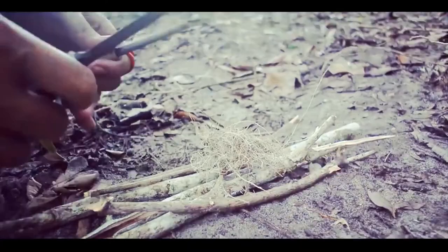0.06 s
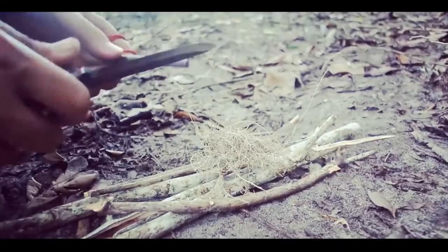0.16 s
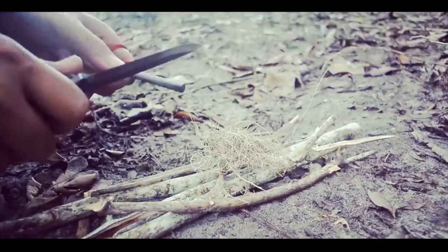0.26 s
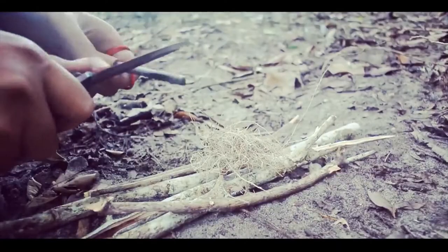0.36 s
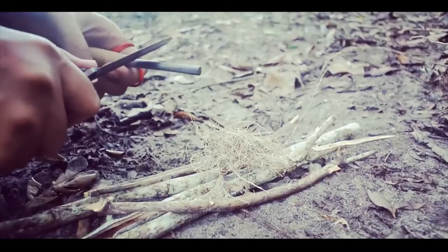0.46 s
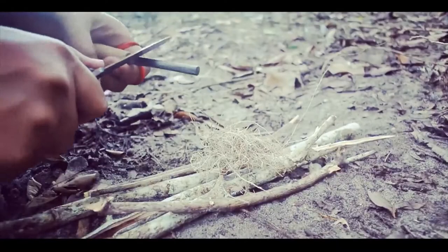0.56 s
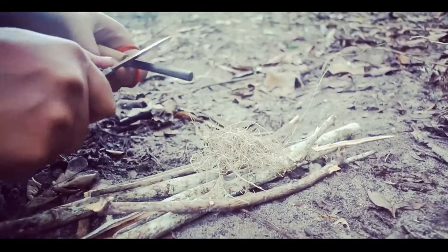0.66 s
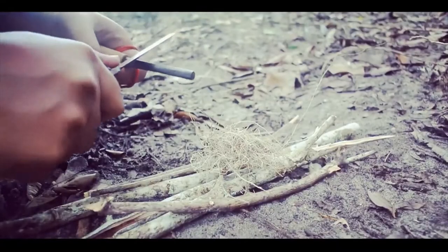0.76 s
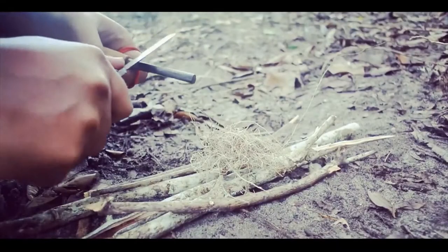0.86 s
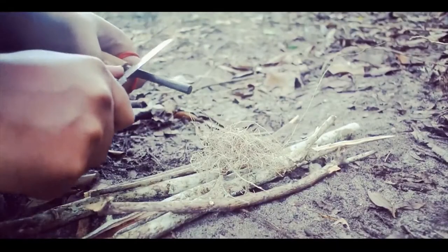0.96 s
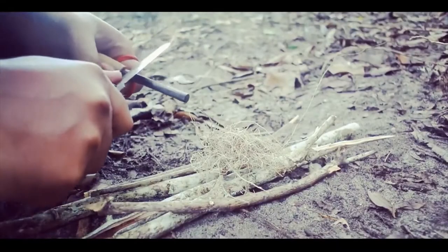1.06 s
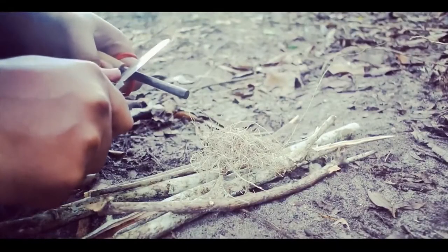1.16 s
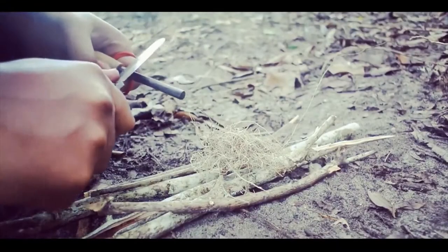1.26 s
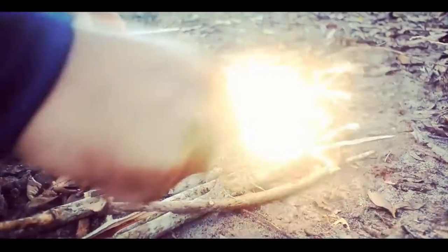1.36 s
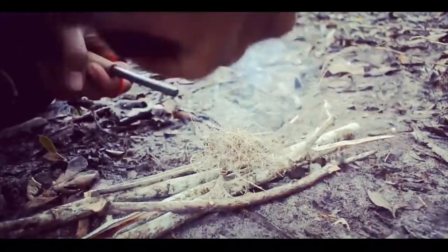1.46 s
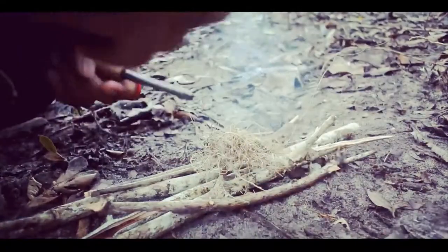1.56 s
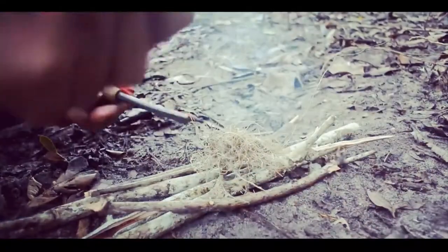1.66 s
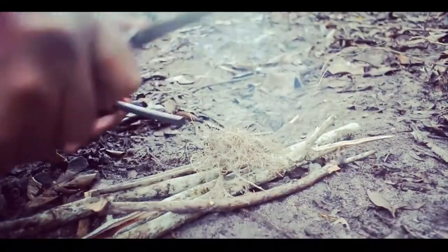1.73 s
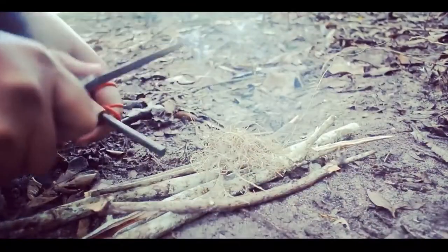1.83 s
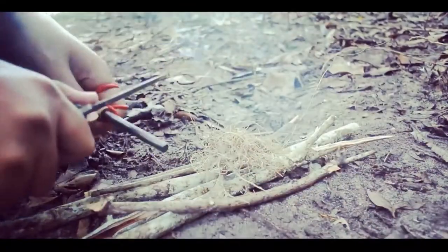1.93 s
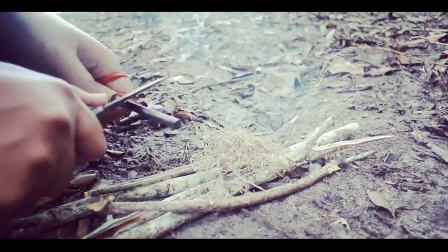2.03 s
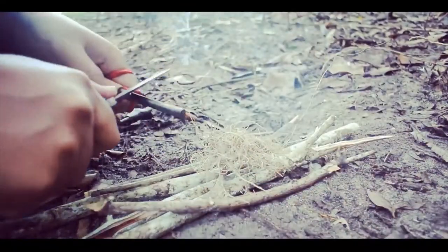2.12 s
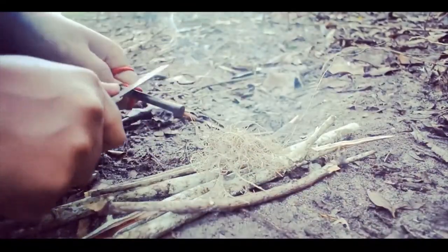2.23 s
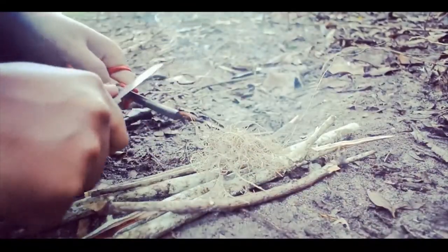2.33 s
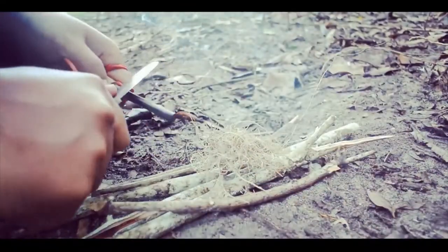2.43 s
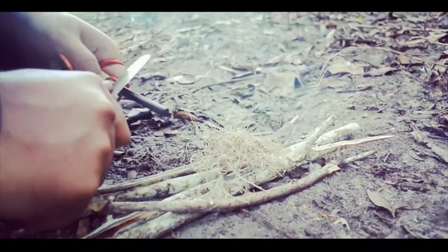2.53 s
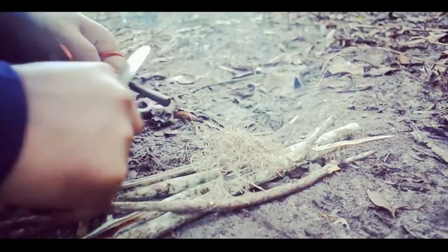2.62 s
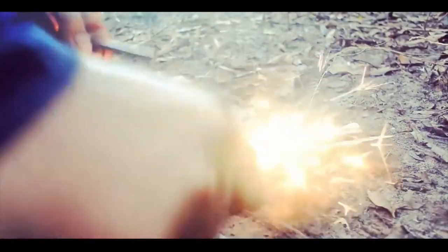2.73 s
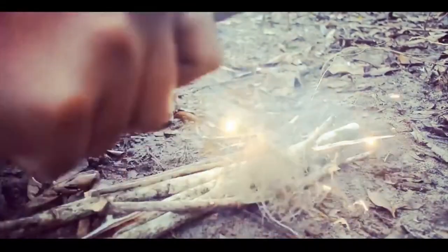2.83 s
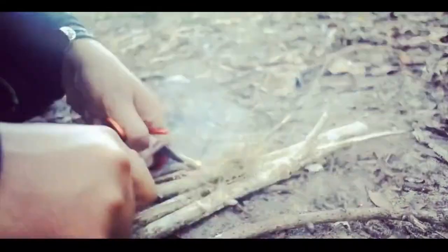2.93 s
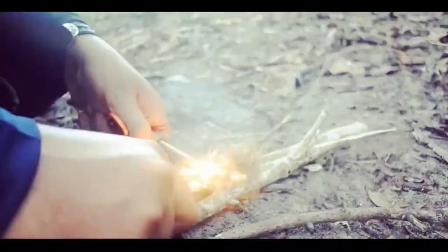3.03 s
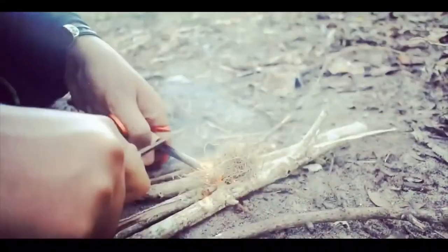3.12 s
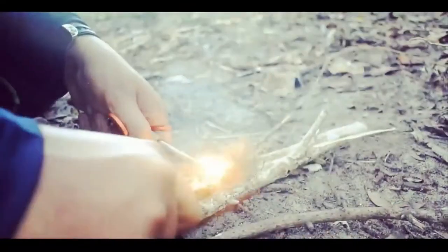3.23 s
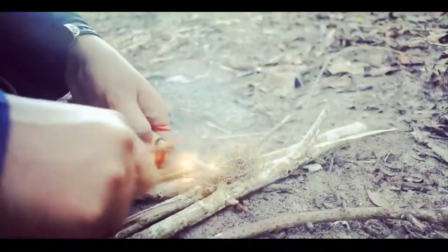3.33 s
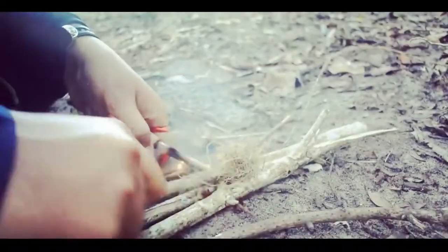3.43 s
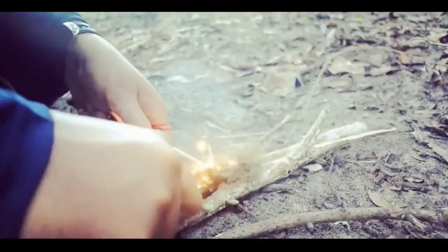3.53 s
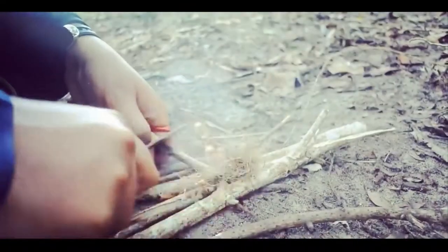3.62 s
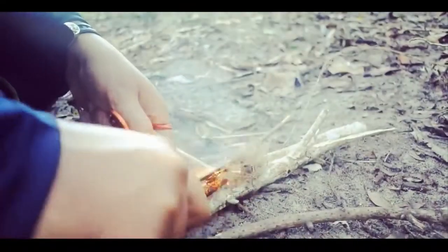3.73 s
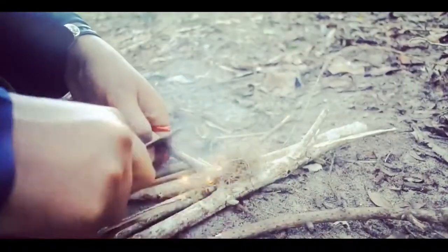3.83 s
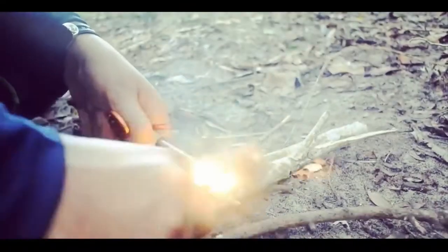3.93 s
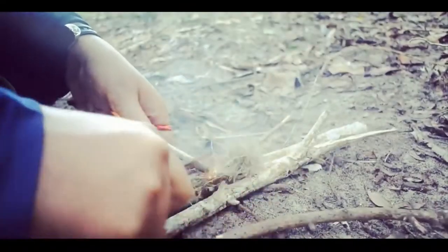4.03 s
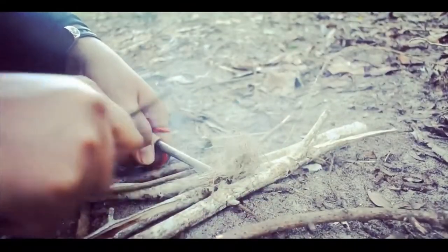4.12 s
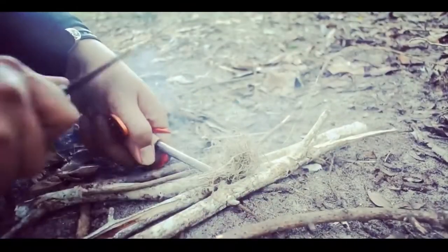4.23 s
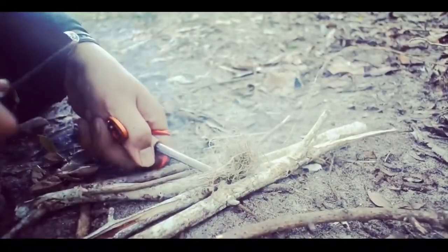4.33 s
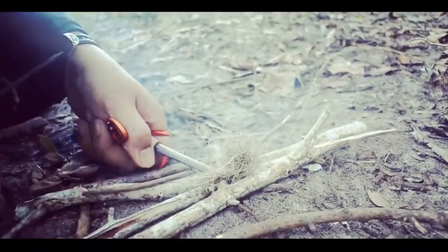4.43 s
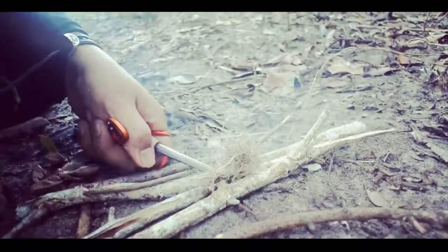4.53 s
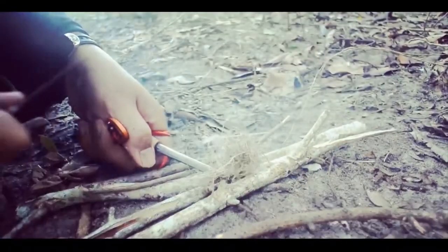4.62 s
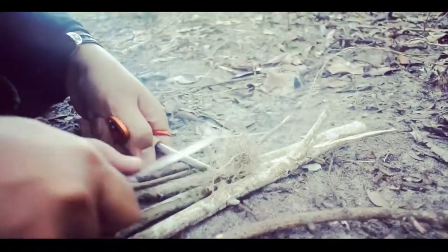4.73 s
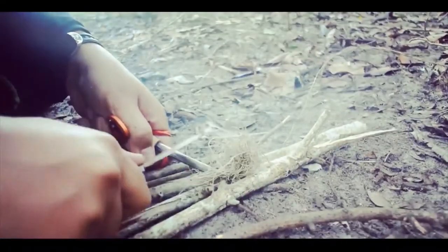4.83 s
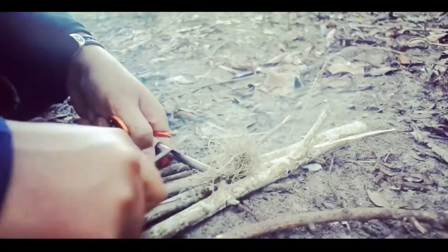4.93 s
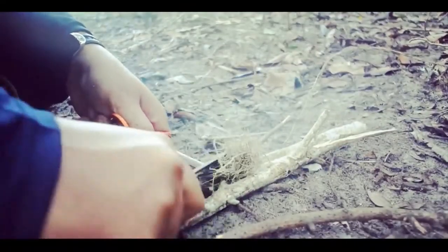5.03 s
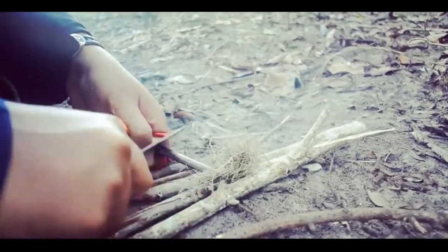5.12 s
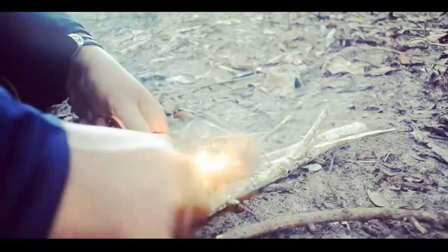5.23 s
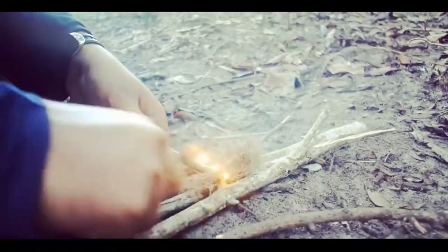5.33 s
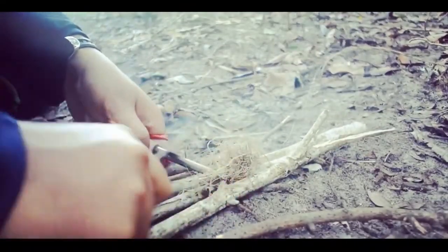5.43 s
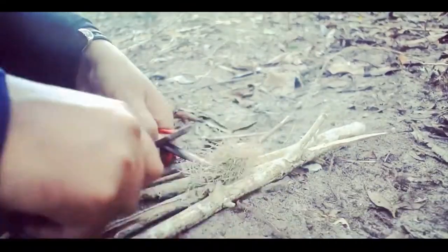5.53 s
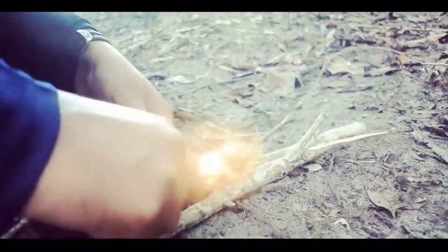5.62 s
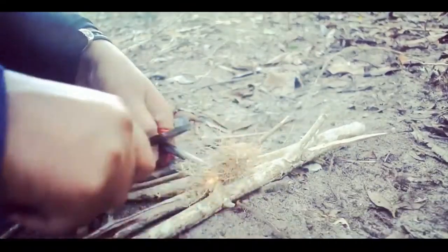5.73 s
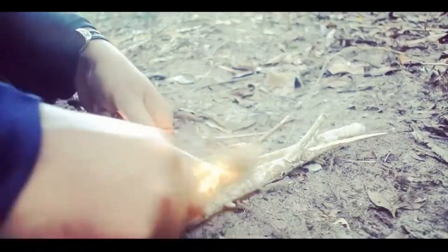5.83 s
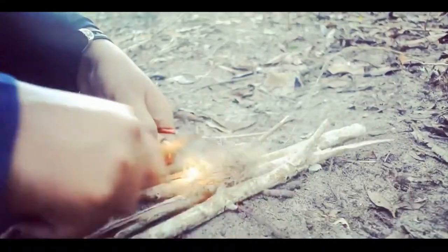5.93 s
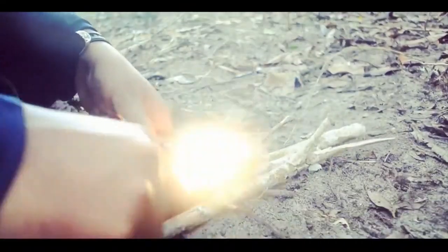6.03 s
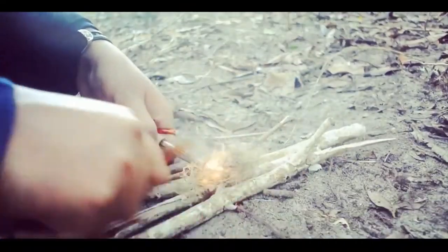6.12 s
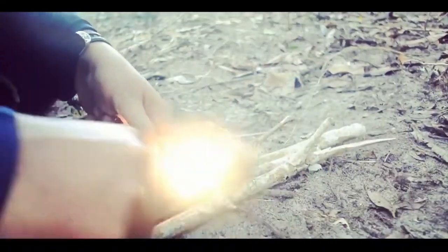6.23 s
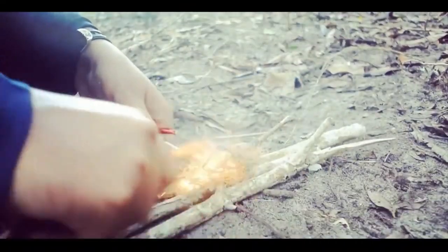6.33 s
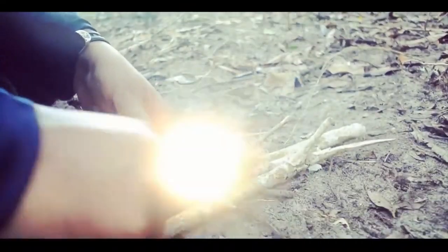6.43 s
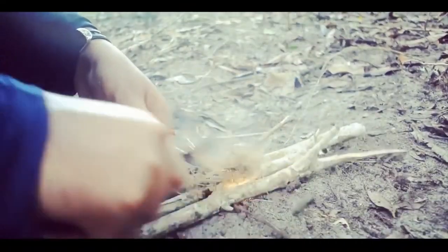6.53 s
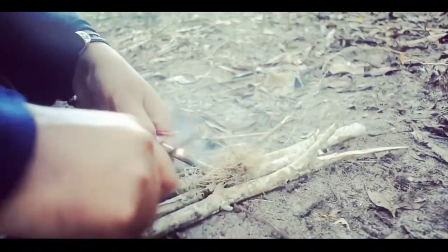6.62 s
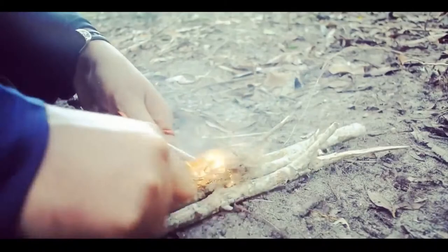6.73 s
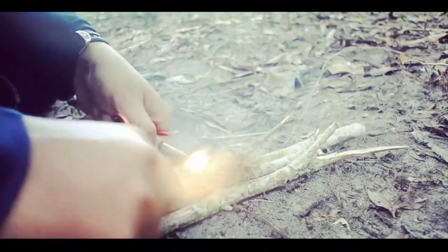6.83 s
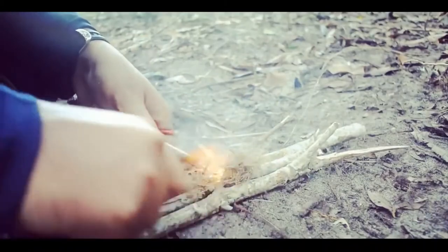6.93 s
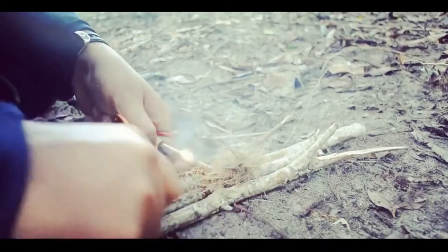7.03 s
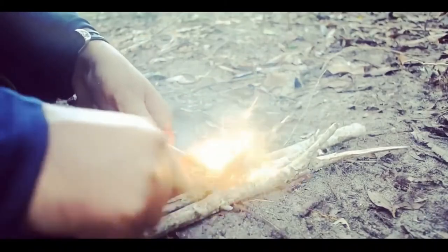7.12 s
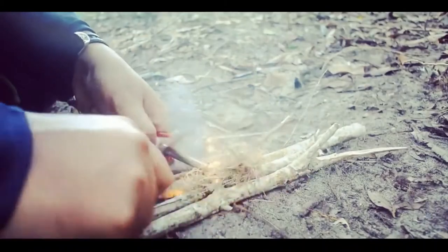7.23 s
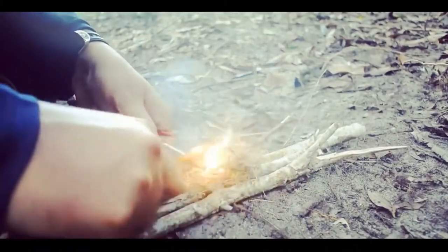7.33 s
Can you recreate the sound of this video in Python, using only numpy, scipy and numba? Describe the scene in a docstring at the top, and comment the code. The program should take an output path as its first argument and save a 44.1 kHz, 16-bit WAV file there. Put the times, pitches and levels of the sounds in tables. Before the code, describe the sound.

Two lone raspy strikes, then rapid back-and-forth scraping of a blade on a ferro rod, clacking and spitting sparks over faint forest air.

```python
"""Quiet woods: a knife blade is scraped along a ferro rod, close to the ground and close to the listener.
Each push shaves the rod in a gritty hiss with a puff of sparks; the blade rasps back, chatters and clacks.
Scrapes are random grains shaped by blade speed and coloured by steel resonances; knocks ring and thud.
Burning flecks snap as short bright crackles, and filtered noise makes a soft rush of air in the trees."""
import sys
import numpy as np
from scipy import signal
from scipy.fft import rfft, irfft
from scipy.io import wavfile
from scipy.ndimage import map_coordinates
from numba import njit

SR = 44100
rng = np.random.default_rng(int(sys.argv[2]) if len(sys.argv) > 2 else 0)


def to_wav(s):
    """Save 16-bit WAV."""
    ch = np.atleast_2d(s).T  # columns
    pcm = np.round(np.clip(ch, -1, 1) * 32767)  # PCM
    wavfile.write(sys.argv[1], SR, pcm.astype(np.int16))


N = 324708

# a stroke is a push down the rod and a drag back:
# start_s, push_length_s, return_length_s, push_hiss_db, return_rasp_db, spark_puff_db (before its swell)
STROKES = [(1.258, 0.091, 0.019, -19, -36, -36), (2.592, 0.11, 0.055, -19.5, -38.5, -38),
           (2.906, 0.16, 0.075, -17.5, -26.5, -36.5), (3.142, 0.13, 0.088, -19, -30, -37.5),
           (3.369, 0.11, 0.11, -18.5, -29.5, -35.5), (3.592, 0.11, 0.11, -17.5, -27.5, -33.5),
           (3.813, 0.1, 0.13, -18, -42.5, -34.5), (4.915, 0.13, 0.07, -21, -28, -59),
           (5.144, .146, 0.062, -18.5, -24.3, -37), (5.4, 0.079, 0.0022, -21.5, -26.5, -42),
           (5.504, 0.18, 0.029, -20.5, -29, -35), (5.74, 0.13, 0.074, -19, -28.5, -37.5),
           (5.96, 0.12, 0.062, -18.5, -29, -36.5), (6.166, .152, 0.04, -21, -33, -35),
           (6.373, 0.11, .069, -19.3, -28.5, -36), (6.589, .135, 0.039, -21.5, -30, -40),
           (6.781, 0.12, 0.089, -19.5, -27.5, -35.5), (6.982, 0.14, .049, -19, -24.5, -34),
           (7.19, 0.13, 0.043, -20.5, -26.5, -36)]
# the blade knocks on the rod: start_s, peak_db, thud_db (against the clack)
BLADE_KNOCKS = [(0.4632, -5.5, -37), (1.99, -12.5, -4), (2.8767, -25.5, 2), (4.8426, 1.5, -10.5),
                (5.0842, -1.5, -30), (5.0999, -4.5, -2), (5.351, -12.5, 7), (5.697, -3, -1.5),
                (5.933, -7, 2), (6.144, -25, 13), (6.542, -4, -0.5), (7.355, -5, 1.5)]
# resonances of blade and rod: pitch_hz, width_hz, lift_db (at full freedom to ring)
STEEL_MODES = [(1550, 120, 3), (2900, 254, 11), (4520, 1100, 6), (6520, 180, -4), (9020, 590, 5),
               (12000, 780, 6.5)]
# colour of the coarse rasp: pitch_hz, level_db
RASP_COLOUR = [(300, -28), (1000, -10.5), (1500, -2.5), (2400, 0.5), (3400, 0.5), (4500, -4.5), (7000, -15),
               (16000, -51)]
# the rod lies a little to the right, so the right channel leads
LEAD_SAMPLES = 2


def undb(db):
    """Turn decibels into gain."""
    return 10 ** (np.asarray(db) / 20)


def unit(x):
    """Scale to rms 1."""
    return x / np.sqrt(np.mean(x ** 2))


def add(out, start_s, sound):
    """Mix a stereo sound in at a start time."""
    i = int(start_s * SR)
    out[:, i:i + sound.shape[1]] += sound[:, :N - i]


def slope(points, hz):
    """Read a colour (pitch_hz, level_db) on a log-frequency axis."""
    point_hz, db = np.transpose(points)
    return np.interp(np.log(hz + 1), np.log(point_hz), db)


def response(points, modes=(), size=1024):
    """Causal minimum-phase impulse response of unit energy: a colour lifted by resonances."""
    hz = np.arange(size // 2 + 1) * SR / size
    db = slope(points, hz)
    for mode_hz, width_hz, lift_db in modes:
        db = db + lift_db / (1 + (2 * (hz - mode_hz) / width_hz) ** 2)
    # folding the cepstrum puts the energy as early as it can be
    cepstrum = irfft(np.log(undb(db)))[:size // 2]
    cepstrum[0] = 0
    impulse = irfft(np.exp(rfft(2 * cepstrum, size)))
    return impulse / np.linalg.norm(impulse)


def filtered(pair, impulse):
    """Pass both channels through one impulse response."""
    return signal.fftconvolve(pair, impulse[None], axes=1)


def walk(n, rate_hz):
    """Random levels, joined by straight lines."""
    steps = np.arange(n) * rate_hz / SR
    knots = rng.standard_normal(int(steps[-1]) + 2)
    return np.interp(steps, np.arange(len(knots)), knots)


def gripped(loose_tight, time_s):
    """Move a setting from its loose to its tight value as the grip tightens from 3.4 s to 5.6 s."""
    return np.interp(time_s, (3.4, 5.6), loose_tight)


def woods(rush_lift_db=1.4, leaves_lift_db=3.5, split_hz=1900, flicker_db=1):
    """Air in the trees: a low rush and an upper leaf hiss of spread noise, heard at a level that dips and recovers."""
    # colour of the air: pitch_hz, level_db
    air_colour = [(15, -55), (25, -27), (49, -21), (185, -4), (223, -6), (256, -3.5), (463, -2),
                  (575, -2.5), (887, -7), (1070, -6.5), (1700, -7.5), (2690, -4.5), (12200, -11.5),
                  (14400, -14.5), (16000, -25)]
    # level of the air as heard: time_s, rush_db, leaf_hiss_db (both before their lifts)
    early_air = [(0.0, -48, -48), (1.15, -45.5, -45.5), (1.37, -51, -48), (1.88, -47, -46.5),
                 (2.34, -50, -51), (2.56, -52, -53.5)]
    # the same further on, where it ducks and recovers: time_s, rush_db, leaf_hiss_db (before their lifts)
    later_air = [(4.06, -53.5, -50.5), (4.282, -48.5, -47), (4.466, -47.5, -47), (4.9, -48.5, -49.5)]
    hz = np.arange(N // 2 + 1) * SR / N
    time_s, rush_db, leaves_db = np.transpose(np.vstack([early_air, later_air]))
    mid, side = rfft(rng.standard_normal((2, N))) * undb(slope(air_colour, hz))
    # less side than mid through the low middle, so the channels are more alike there
    side *= undb(slope([(60, 0), (200, -8.5), (700, -6), (1400, -4.5), (5000, 0)], hz))
    both = np.array([mid + side, mid - side])
    low_share = 1 / (1 + (hz / split_hz) ** 4)
    out = 0
    for share, db in ((low_share, rush_db + rush_lift_db), (1 - low_share, leaves_db + leaves_lift_db)):
        level_db = np.interp(np.arange(N) / SR, time_s, db) + flicker_db * walk(N, 22)
        out = out + unit(irfft(both * share, N)) * undb(level_db)
    return out


def contact_space(x, scatter_db, t60_s=0.013, pan_db=1.5):
    """A single contact: direct sound plus treble scattered by hands and ground, different in each channel."""
    t = np.arange(int(.03 * SR)) / SR
    scatter = rng.standard_normal((2, len(t))) * undb(-60 * t / t60_s) * (1 - np.exp(-t / 0.00046))
    scatter /= np.linalg.norm(scatter, axis=1, keepdims=True)
    treble = signal.butter(1, 2500, "high", fs=SR, output="sos")
    paths = undb(scatter_db) * signal.sosfilt(treble, scatter)
    # direct sound: the right channel first
    paths[0, LEAD_SAMPLES] += 1
    paths[1, 0] += 1
    paths *= undb([[-pan_db / 2], [pan_db / 2]]) / np.hypot(1, undb(scatter_db))
    return signal.fftconvolve(x[None], paths, axes=1)


def knocks(ring_t60_s=0.025, steel_share=0.93, soft_dulling=0.31):
    """A hard contact: a dry clack, a short ring that the fingers damp, and a thud through the rod."""
    # colour of the clack: pitch_hz, level_db
    clack_colour = [(100, -28), (900, -15), (1500, -19.5), (2300, 7), (3800, -0.5), (5300, -3.5),
                    (6500, -6), (9000, -6.5), (16000, -26)]
    # colour of a blow carried through the rod into the hand: pitch_hz, level_db
    thud_colour = [(40, -39), (150, -10), (600, 0.5), (1250, 20), (1800, -3), (4000, -19), (16000, -52)]
    # partials of the ring: pitch_multiple, level_db (for a knock at 0 dB)
    ring_partials = [(1, 2.5), (1.16, -4.5), (1.83, -3), (2.39, -8.5), (3.16, 0)]
    out = np.zeros((2, N))
    # pressed against the rod, the blade rings less freely
    modes = [(hz, width_hz, lift_db * steel_share) for hz, width_hz, lift_db in STEEL_MODES]
    clack = response(clack_colour, modes)
    t = np.arange(len(clack)) / SR
    for start_s, peak_db, thud_db in BLADE_KNOCKS:
        ring_hz = gripped((2864, 2535), start_s)
        ring_db = gripped((5.5, -16), start_s)  # against the clack
        ring = 0
        for multiple, part_db in ring_partials:
            # a softer knock loses the upper partials
            part_gain = undb(part_db + soft_dulling * peak_db * (multiple - 1))
            ring = ring + part_gain * np.sin(2 * np.pi * ring_hz * multiple * t)
        ring = ring * undb(-60 * t / ring_t60_s)
        hit = clack + undb(thud_db) * response(thud_colour)
        # the edge skips once as it lands, 0.48 ms later
        hit = hit + .7 * np.pad(hit, (int(.00048 * SR), 0))[:len(hit)]
        hit = hit + undb(ring_db) * ring / np.linalg.norm(ring)
        hit = contact_space(hit, scatter_db=-6)
        add(out, start_s, hit * undb(peak_db) / np.abs(hit).max())
    return out


def grit(n, rate_hz, spread_db):
    """Tiny fractures of uneven size, at random moments."""
    hits = rng.random(n) < rate_hz / SR
    size_db = spread_db * rng.exponential(size=n)
    return unit(hits * rng.choice([-1, 1], n) * undb(size_db))


def grit_pair(n, rate_hz, spread_db, judder_db, judder_hz, scatter_db, pan_db):
    """Stereo grit juddering with stick and slip: one shared direct part, unrelated scatter left and right."""
    direct, left, right = (grit(n, rate_hz, spread_db) for _ in range(3))
    pair = np.array([np.roll(direct, LEAD_SAMPLES), direct])
    pair = pair + undb(scatter_db) * np.array([left, right])
    judder = undb(judder_db * walk(n, judder_hz))
    return unit(pair * judder * undb([[-pan_db / 2], [pan_db / 2]]))


def hand_echo(pair, gain=0.99):
    """The moving hands reflect the sound a millisecond or so late, combing each channel with sliding notches."""
    i = np.arange(pair.shape[1])
    out = []
    for side in pair:
        lag = rng.uniform(.0006, .002) * SR * (1 + rng.normal(0, .6) * i / SR)
        out.append(side + gain * map_coordinates(side, [i - lag], order=3))
    return unit(np.array(out))


@njit
def swept_band(x, hz, width_hz):
    """State-variable band-pass whose centre moves; gain 1 at the centre."""
    y, band, low = np.empty(len(x)), 0., 0.
    for i in range(len(x)):
        g, k = np.tan(np.pi * hz[i] / SR), width_hz / hz[i]
        v = (band + g * (x[i] - low)) / (1 + g * (g + k))
        band, low, y[i] = 2 * v - band, low + 2 * g * v, k * v
    return y


def sing(pair, hz, width_hz, band_db):
    """Add a resonance whose centre moves."""
    return pair + undb(band_db) * np.array([swept_band(side, hz, float(width_hz)) for side in pair])


def scrapes(moves, grain_hz, judder_db, bend_db, end_hz=2800, middle_hz=1550):
    """Each movement swells with the blade's speed: fine hiss, coarse singing rasp and a puff of sparks."""
    # colour of the fine shaving hiss: pitch_hz, level_db
    hiss_colour = [(1000, -27.5), (3000, -9.5), (5000, -5.5), (7000, -1), (11000, 0.5), (13500, -2),
                   (16000, -5)]
    # colour of the spark puff: pitch_hz, level_db
    puff_colour = [(30, -28), (100, -13), (300, -4.5), (700, -2.5), (1100, -5), (2500, -15.5), (16000, -54)]
    out = np.zeros((2, N))
    for start_s, end_s, rise_s, fall_s, hiss_db, rasp_db, puff_db in moves:
        t = np.arange(int((end_s - start_s) * SR)) / SR
        n = len(t)
        speeding_up = np.sin(np.pi / 2 * np.clip(t / rise_s, 0, 1))
        slowing_down = np.sin(np.pi / 2 * np.clip((t[-1] - t) / fall_s, 0, 1))
        speed = speeding_up * slowing_down
        middle = np.sin(np.pi * t / t[-1]) ** 2
        pressure = unit(undb(1.3 * walk(n, 90) + judder_db * walk(n, 520)))

        # every movement meets the steel at another spot and favours other resonances
        freedom = gripped((.85, .65), start_s) * rng.uniform(.5, 1.5, len(STEEL_MODES))
        modes = []
        for (hz, width_hz, lift_db), free in zip(STEEL_MODES, freedom):
            modes.append((hz * (1 + 0.014 * rng.standard_normal()), width_hz, lift_db * free))

        shaving = grit_pair(n, 16000, spread_db=2.5, judder_db=-1.1, judder_hz=1400,
                            scatter_db=13.5, pan_db=3.0)
        shaving = hand_echo(shaving)
        # the thin edge has high resonances of its own, which wander with the grip
        for hz in (6500, 10900):
            shaving = sing(shaving, hz * np.exp(.07 * walk(n, 22)), width_hz=550, band_db=0)
        # the fine hiss rises and falls with the blade's speed
        hiss = unit(shaving) * pressure * speed ** 1.01 * undb(hiss_db)
        add(out, start_s, filtered(hiss, response(hiss_colour, modes)))

        ridges = grit_pair(n, grain_hz, spread_db=2.0, judder_db=1.0, judder_hz=127.6,
                           scatter_db=-3, pan_db=-0.3)
        # the contact slides along the blade: one bending resonance sinks mid-stroke and climbs again
        bend_hz = (end_hz + (middle_hz - end_hz) * middle) * np.exp(.05 * walk(n, 30))
        rasp = sing(ridges, bend_hz, 280, bend_db) * pressure * speed
        rasp = filtered(rasp, response(RASP_COLOUR, modes))
        rasp_gain = undb(rasp_db) * np.linalg.norm(speed) * np.sqrt(2) / np.linalg.norm(rasp)
        add(out, start_s, rasp * rasp_gain)

        # the shavings flare once the edge is under way
        sparks = grit_pair(n, 3000, spread_db=2.0, judder_db=3.5, judder_hz=69.0,
                           scatter_db=-5.0, pan_db=0.5)
        puff = sparks * np.sqrt(speed * middle) * undb(puff_db)
        add(out, start_s, filtered(puff, response(puff_colour)))
    return out


def push_moves(bite_s=0.021, swing_s=0.047, rest_s=0.3, fall_share=0.76):
    """Each push bites, shaves the rod and slows towards the tip; rows as scrapes() unpacks them."""
    moves, last_end_s = [], 0
    for start_s, push_s, back_s, hiss_db, _, puff_db in STROKES:
        # speed comes at once from rest, more slowly in a run of strokes
        rise_s = bite_s if start_s - last_end_s > rest_s else swing_s
        rasp_db = hiss_db + gripped((-11, -9.5), start_s)
        moves.append((start_s, start_s + push_s, rise_s, fall_share * push_s, hiss_db, rasp_db, puff_db))
        last_end_s = start_s + push_s + back_s
    return moves


def return_moves(overlap_s=0.025, rise_share=0.48, fall_share=0.81, jam_window_s=0.02):
    """The blade is dragged back and either glides off or jams with a knock; rows as for a push."""
    moves = []
    for start_s, push_s, back_s, _, rasp_db, _ in STROKES:
        end_s = start_s + push_s + back_s
        # the return sets in before the push has died away
        length_s = back_s + overlap_s
        jammed = any(abs(knock[0] - end_s) < jam_window_s for knock in BLADE_KNOCKS)
        # hiss and puff levels are against the rasp; a jammed return shaves less and stops short
        if jammed:
            fall_s, hiss_db, puff_db = 0.011, -2.5, -14.5
        else:
            fall_s, hiss_db, puff_db = fall_share * length_s, 3.5, -11.5
        moves.append((end_s - length_s, end_s, rise_share * length_s, fall_s,
                      rasp_db + hiss_db, rasp_db, rasp_db + puff_db))
    return moves


def catches(length_s=0.025, lift_db=11, width_hz=480):
    """The edge digs in and chatters, driving a resonance set by the point of contact."""
    # chatters of the edge: start_s, level_db, resonance_hz
    chatters = [(1.28, -21.5, 2130), (1.285, -20, 3100), (1.289, -28.5, 1590), (2.615, -17, 2900),
                (3.742, -27, 1650), (4.918, -26.5, 2820), (5.076, -21, 2570), (5.677, -30, 2660),
                (5.869, -29.5, 2780), (6.087, -28.5, 1640), (6.293, -26.5, 2620), (6.411, -22, 2180),
                (6.49, -19.5, 2760), (6.499, -32.5, 1640), (6.893, -26, 2700), (7.342, -20.5, 2600)]
    out = np.zeros((2, N))
    n = int(length_s * SR)
    for start_s, level_db, hz in chatters:
        slips = grit_pair(n, 4000, spread_db=2, judder_db=2.5, judder_hz=600, scatter_db=-4, pan_db=2)
        burst = filtered(slips * np.hanning(n), response(RASP_COLOUR, [(hz, width_hz, lift_db)]))
        add(out, start_s, burst * undb(level_db) * np.sqrt(n) / np.linalg.norm(burst))
    return out


def snaps(gain_db=2):
    """A burning fleck bursts in a few milliseconds of bright crackle."""
    # snapping flecks of hot metal: start_s, peak_db (before the shared gain)
    flecks = [(2.422, -30), (3.099, -9.5), (3.4262, -5), (3.9894, -14.5), (5.3302, -2.5), (5.3814, -13),
              (5.696, -7), (5.702, -13), (6.274, -9), (6.5583, -10.5)]
    # colour of a snap: pitch_hz, level_db
    snap_colour = [(2000, -24), (6000, -5), (9000, -1), (12000, 4), (16000, -4)]
    out = np.zeros((2, N))
    t = np.arange(int(.02 * SR)) / SR
    for start_s, peak_db in flecks:
        crackle = grit_pair(len(t), 12000, spread_db=2, judder_db=2, judder_hz=900,
                            scatter_db=3, pan_db=2.5)
        snap = filtered(crackle * undb(-60 * t / 0.03), response(snap_colour, STEEL_MODES))
        add(out, start_s, snap * undb(peak_db + gain_db) / np.abs(snap).max())
    return out


def scene():
    """Smooth pushes and coarser returns, with their chatter, knocks and snaps, in the woods."""
    pushes = scrapes(push_moves(), grain_hz=6000, judder_db=0.33, bend_db=2.0)
    returns = scrapes(return_moves(), grain_hz=3000, judder_db=1.3, bend_db=3.0)
    return woods() + knocks() + pushes + returns + catches() + snaps()


def record(dry, ceiling=.8, top_hz=15900):
    """Round the highest peaks under a soft ceiling, then cut the top steeply."""
    rounded = dry / (1 + (dry / ceiling) ** 6) ** (1 / 6)
    top_cut = signal.ellip(10, .2, 70, top_hz, fs=SR, output="sos")
    return signal.sosfilt(top_cut, rounded)


dry = scene()
out = record(dry)
to_wav(out)
```